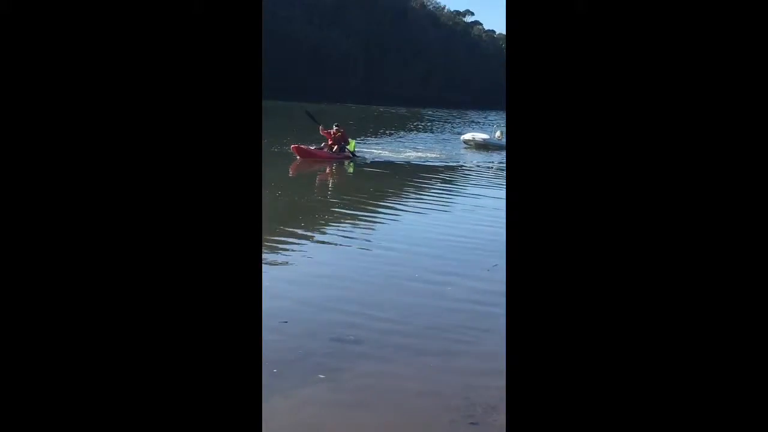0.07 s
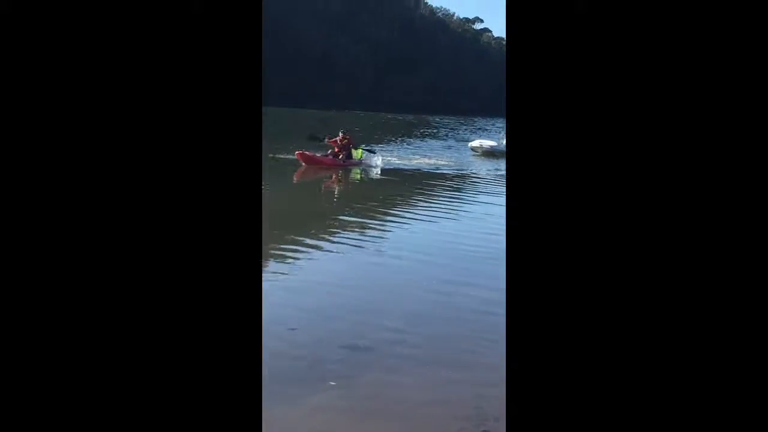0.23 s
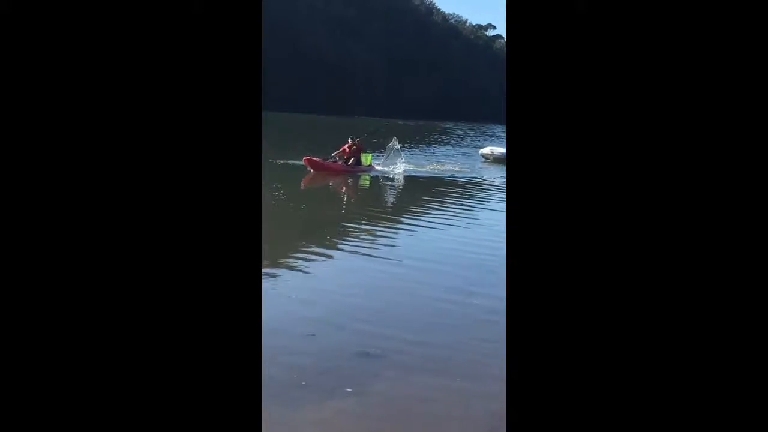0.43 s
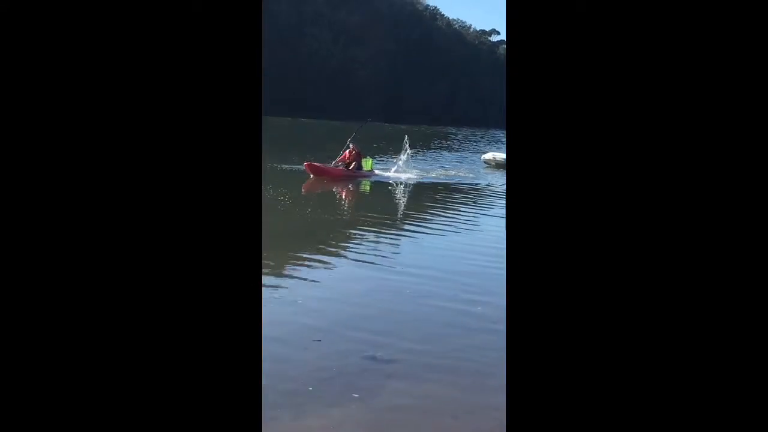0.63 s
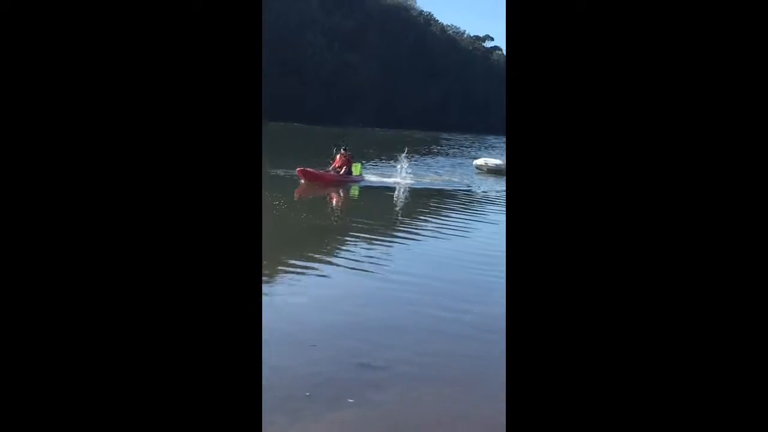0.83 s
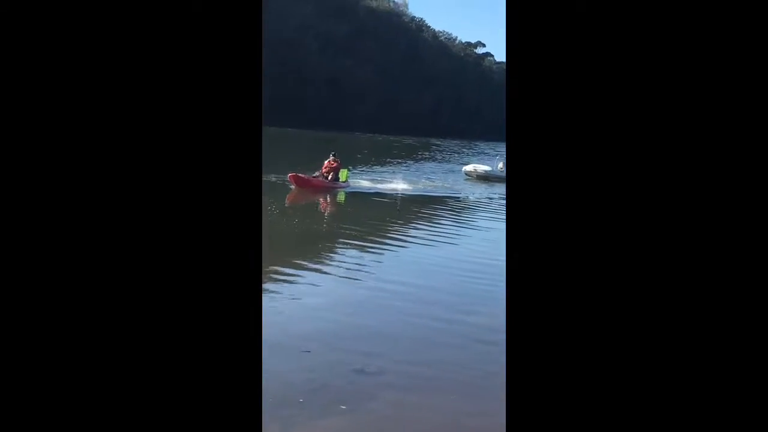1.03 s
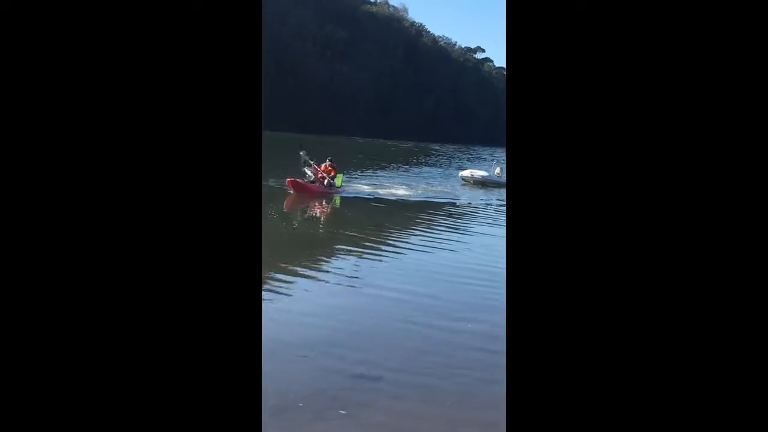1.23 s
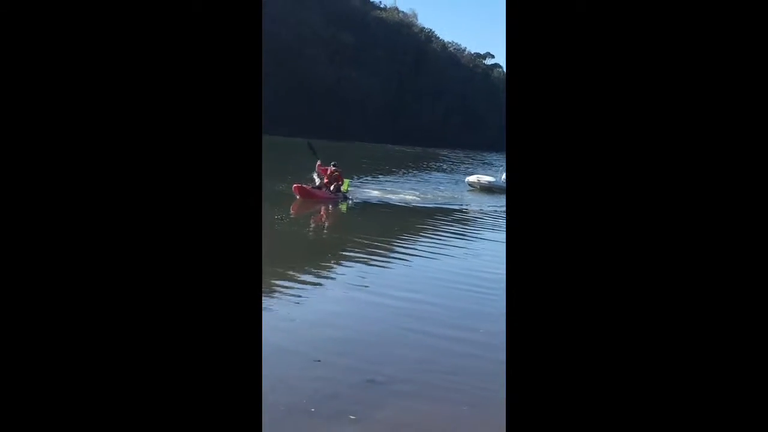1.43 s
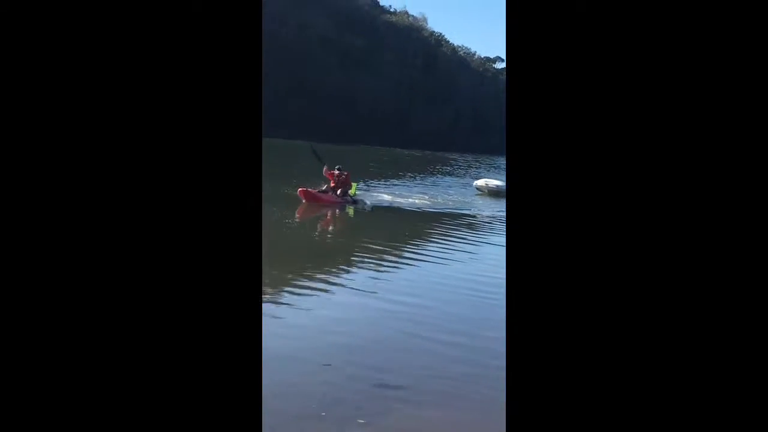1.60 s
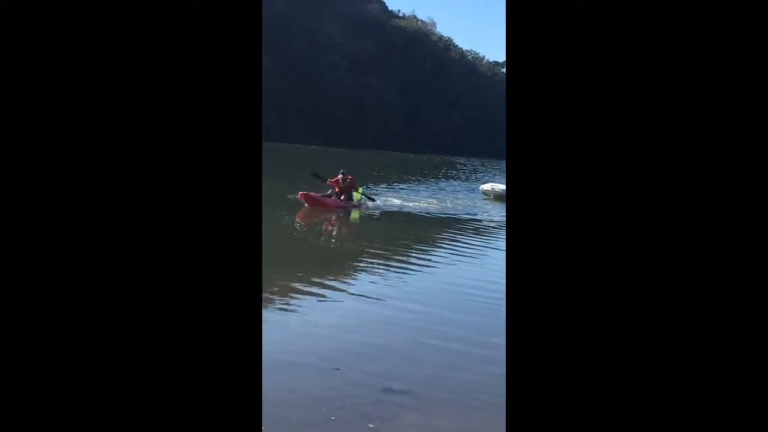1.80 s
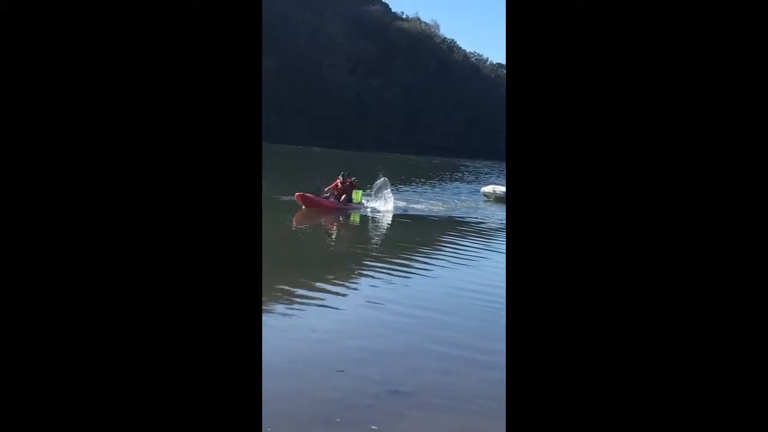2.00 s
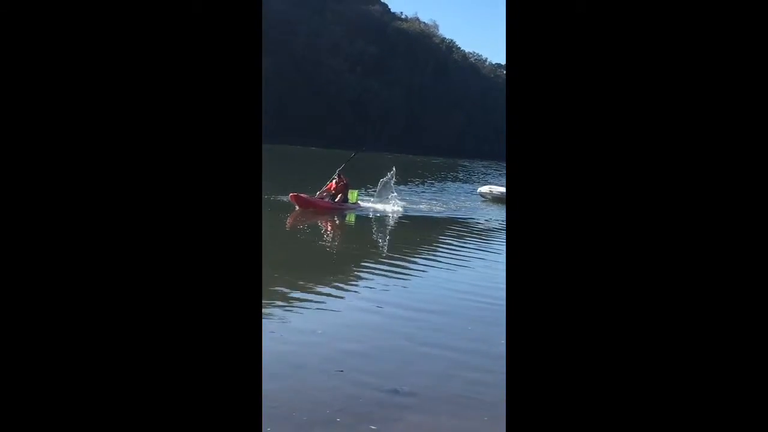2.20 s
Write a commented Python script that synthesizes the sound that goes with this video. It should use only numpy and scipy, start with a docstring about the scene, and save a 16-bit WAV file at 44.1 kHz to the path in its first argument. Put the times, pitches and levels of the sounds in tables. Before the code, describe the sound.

Wind buffets the microphone over faint splashes from a kayak paddle.

```python
"""A kayak paddled across a calm river, heard from the bank with wind on the microphone.
At the start a small bird gives one falling whistle as the first gust arrives, rumbling close up,
its eddies thumping against the microphone. In the lull, about a second in, the paddle is clearer:
some way off it throws up spray that patters back with a few plops and slaps.
A second gust covers the water and dies away at the end."""
import sys
import numpy as np
from scipy import signal
from scipy.io import wavfile
from scipy.ndimage import uniform_filter1d

SR = 44100
rng = np.random.default_rng(int(sys.argv[2]) if len(sys.argv) > 2 else 0)


def transcribe(signal):
    """Save signal, clipped to [-1, 1], as a 16-bit WAV file at the path in sys.argv[1]."""
    frames = np.atleast_2d(signal).T
    limited = np.clip(frames, -1, 1)
    pcm = np.round(limited * 32767).astype(np.int16)
    wavfile.write(sys.argv[1], SR, pcm)


N = 103635
T = np.arange(N) / SR

# still air over the river: (frequency [Hz], relative density [dB])
AIR_SPECTRUM = [(30, 2), (70, 2), (160, 5), (300, -4), (480, -15), (700, -16), (1500, -13.5), (4000, -42),
                (15000, -52)]
# the bird's whistle: (time [s], pitch [Hz], level [dB])
WHISTLE = [(0, 5350, -63), (.03, 5390, -67), (.055, 5350, -63.5), (.068, 5020, -71), (.08, 4730, -58),
           (.095, 4315, -51.5), (.115, 4280, -55), (.132, 4350, -59.5), (.145, 4300, -75)]
# falling water, heard from the bank: (time [s], splash level [dB], spray level [dB])
WATER_LEVELS = [(0.02, -59.5, -75), (.065, -60, -72), (.095, -53.5, -69), (.16, -55, -67.5),
                (.34, -56, -67.5), (.44, -61.5, -70), (.54, -56, -72), (.62, -55.5, -69.5), (.68, -56, -68),
                (.8, -52, -67), (.88, -54, -66), (.94, -52, -63.5), (1.04, -55, -63), (1.12, -53, -69.5),
                (1.25, -53.5, -65.5), (1.3, -58, -68.5), (1.39, -58.5, -74), (1.48, -56.5, -73.5),
                (1.58, -64, -73), (1.71, -58.5, -70), (1.78, -54.5, -64), (1.85, -54.5, -66.5),
                (1.97, -52.5, -63.5), (2.06, -55, -64.5), (2.16, -53, -65.5), (2.27, -51, -59),
                (2.35, -51.5, -60.5)]
# body of the splash: (frequency [Hz], relative density [dB])
SPLASH_SPECTRUM = [(250, 7.5), (400, -4.5), (600, 1), (850, 4.5), (1080, -3.5), (1350, 6), (1800, 0),
                   (2300, -2.5), (2700, -6.5), (3500, -7), (5000, -19.5), (7000, -23.5)]
# fine spray: (frequency [Hz], relative density [dB])
SPRAY_SPECTRUM = [(3500, -3), (5000, -2.5), (6500, -1.5), (9000, -6.5), (10300, -8), (11500, -15.5),
                  (13500, -7.5), (15500, -29)]
# single large bubbles: (time [s], level [dB], pitch [Hz], time to fall 60 dB [s])
PLOP_EVENTS = [(0.123, -34, 1350, 0.017), (0.177, -35, 1265, 0.021), (.186, -36, 805, 0.02),
               (1.055, -26.5, 1360, 0.011), (1.316, -37.5, 680, 0.034), (1.496, -30, 1370, 0.011),
               (1.862, -33, 1320, 0.017), (1.904, -43.5, 1700, 0.043), (2.309, -32.5, 1380, 0.018)]
# slaps out on the water: (time [s], level [dB], decay [s])
SLAP_EVENTS = [(0.077, -56.5, 0.017), (0.088, -49.5, 0.012), (0.386, -50, 0.0022), (0.573, -59, 0.0097),
               (.757, -73, 0.0059), (1.110, -46.5, .005), (1.192, -50.5, 0.018), (1.238, -51.5, 0.01),
               (1.255, -53, 0.0036), (1.533, -51.5, 0.007), (1.766, -56.5, 0.032), (1.961, -52, 0.027)]
# struck water: (frequency [Hz], relative density [dB])
SLAP_SPECTRUM = [(600, 7), (1400, -3.5), (3000, 1.5), (6000, -16), (9000, -16), (15000, -45)]
# wind at the microphone: (time [s], level [dB])
WIND_LEVELS = [(0, -35.5), (.06, -37.5), (.12, -30.5), (.18, -36.5), (.23, -26.5), (.35, -24), (.41, -22),
               (.48, -26), (.55, -24.5), (.59, -29), (.65, -33), (.69, -31), (.8, -40), (.9, -40.5),
               (1.02, -40), (1.1, -52), (1.17, -39), (1.22, -34), (1.33, -36.5), (1.4, -28), (1.47, -29),
               (1.54, -28), (1.585, -42), (1.63, -25.5), (1.72, -27), (1.77, -25), (1.85, -21.5),
               (1.92, -25), (2.0, -23.5), (2.08, -27.5), (2.115, -33.5), (2.19, -27.5), (2.235, -41),
               (2.275, -32.5), (2.35, -44.5)]
# rumble in a strong gust: (frequency [Hz], relative density [dB])
RUMBLE_SPECTRUM = [(26, -33), (42, -1), (65, 5.5), (95, 1.5), (150, -4), (240, -5.5), (340, -11.5),
                   (480, -24.5), (700, -34), (1100, -57)]
# eddies on the microphone: (time [s], swing level [dB], centre [Hz], edge level [dB])
EDDY_HITS = [(.199, -16.5, 75, -49), (.230, -19.5, 162, -48), (0.265, -18, 217, -48),
             (0.299, -23, 182, -50), (.334, -41, 129, -31), (.389, -8, 97, -19.5), (0.41, -13.5, 160, -28),
             (0.434, -22.5, 193, -40), (.461, -16, 121, -31.5), (.502, -16, 200, -25.5),
             (.547, -13, 79, -27), (.618, -14, 201, -35), (.683, -22.5, 79, -33), (0.747, -20.5, 68, -45),
             (0.779, -25, 174, -50), (.848, -23, 76.5, -64), (1.017, -30.5, 62, -72),
             (1.217, -22, 124, -38), (1.294, -28.5, 97, -52), (1.374, -26.5, 181, -54),
             (1.462, -18, 119, -50), (1.495, -24, 170, -60), (1.636, -16, 106, -39), (1.667, -18, 205, -30),
             (1.715, -20, 139, -28), (1.75, -13.5, 148, -27.5), (1.763, -17.5, 188, -32),
             (1.808, -11.5, 147, -16.5), (1.825, -14, 220, -25), (1.840, -17, 204, -44),
             (1.996, -18, 133, -19), (2.035, -21, 222, -28), (2.085, -15, 133, -35),
             (2.179, -15.5, 102, -40), (2.216, -34, 194, -39), (2.273, -21.5, 65, -64)]

AIR_DB, BANK_T60_S, CUTOFF_HZ = -56.5, .8, 15700
BIRD_FLUTTER_DB, BIRD_OCTAVE_DB, BIRD_ECHO_DB, BIRD_WAVER = 3, -21, -14, .0076
SPLASH_DB, SPRAY_DB, SPLASH_FLICKER_DB, SPRAY_FLICKER_DB = 1, 1.5, 1.57, 1.5
DROPS_PER_S, DROP_SPREAD_DB, DROP_SHARE = 650, 9.5, .28
BUBBLES_PER_S, BUBBLE_RING_CYCLES, BUBBLE_DB = 190, 66, -9
PLOP_ATTACK_S, PLOP_RISE = .0015, .08   # rise: fraction of the pitch per ring time
FLUTTER_DB, FLUTTER_HZ = 5.5, 15
GUST_DB, BRIGHTENS_ABOVE_HZ, BRIGHTENING = -21.5, 75, .5   # dB per octave for each dB of wind
EDDY_HALF_WIDTH_CYCLES, EDDY_LOW_CUT_HZ = .39, 47.4
EDGE_WIDTH_S, EDGE_LEAD_S = .00085, .0011
EDGE_REF_DB, EDGE_HALVING_DB = -24.5, 37.5   # a stronger edge is also shorter


def from_db(db):
    """Decibels to gain."""
    return 10 ** (np.asarray(db) / 20)


def rms_one(x):
    """Scale to rms 1."""
    return x / np.sqrt(np.mean(x ** 2) + 1e-20)


def in_time(rows):
    """Each column of a curve at every sample."""
    times, *columns = np.transpose(rows)
    return [np.interp(T, times, column) for column in columns]


def filtered(x, hz, kind, order=2):
    """Butterworth filter."""
    return signal.sosfilt(signal.butter(order, hz, kind, fs=SR, output="sos"), x)


def drift(hz):
    """Random motion of rms 1, mostly slower than hz."""
    hop, settle = 40, 2000
    pole = np.exp(-2 * np.pi * hz * hop / SR)
    noise = rng.standard_normal(N // hop + settle + 2)
    slow = signal.lfilter([1], [1, -2 * pole, pole * pole], noise)[settle:]
    return np.interp(np.arange(N) / hop, np.arange(len(slow)), rms_one(slow))


def bands(spectrum, count):
    """Split a spectrum into bands of total power 1: (low [Hz], high [Hz], gain)."""
    hz, db = np.transpose(spectrum)
    edges = np.geomspace(hz[0], hz[-1], count + 1)
    log_centres = np.log(edges[:-1] * edges[1:]) / 2
    gain = from_db(np.interp(log_centres, np.log(hz), db)) * np.sqrt(np.diff(edges))
    return zip(edges, edges[1:], gain / np.linalg.norm(gain))


def impacts(per_s):
    """Random clicks, many small and a few large."""
    sizes = from_db(DROP_SPREAD_DB * np.minimum(rng.exponential(1, N), np.pi))
    signs = rng.choice([-1, 1], N)
    return sizes * signs * (rng.random(N) < per_s / SR) + 1e-18


def wash(spectrum, flicker_db, drop_share, count):
    """Noise mixed with drop impacts; the bands flicker singly and together."""
    out, together = 0, drift(60)
    drops = rms_one(impacts(DROPS_PER_S))
    for low, high, gain in bands(spectrum, count):
        source = np.sqrt(drop_share) * drops + np.sqrt(1 - drop_share) * rng.standard_normal(N)
        band = rms_one(filtered(source, [low, high], "band"))
        out += gain * band * from_db(flicker_db * (drift(17) + together))
    return rms_one(out)


def air():
    """Still outdoor air: a faint, steady bed of noise."""
    return from_db(AIR_DB) * wash(AIR_SPECTRUM, flicker_db=0, drop_share=0, count=12)


def bird():
    """One falling whistle, with a faint tail from the wooded banks."""
    hz, db = in_time(WHISTLE)
    phase = 2 * np.pi * np.cumsum(hz * (1 + BIRD_WAVER * drift(120))) / SR
    tone = np.sqrt(2) * (np.sin(phase) + from_db(BIRD_OCTAVE_DB) * np.sin(2 * phase))
    call = tone * from_db(db + BIRD_FLUTTER_DB * drift(150)) * (T < WHISTLE[-1][0])
    banks = rng.standard_normal(N) * from_db(-60 * T / BANK_T60_S)
    echo = signal.fftconvolve(call, banks / np.linalg.norm(banks))[:N]
    return call + from_db(BIRD_ECHO_DB) * echo


def bubbles():
    """Small bubbles ring at random moments, the higher ones more briefly."""
    out, pitches = 0, np.geomspace(700, 3200, 20)
    for hz in pitches:
        pole = from_db(-60 * hz / (BUBBLE_RING_CYCLES * SR))
        angle = 2 * np.pi * hz / SR
        kicks = impacts(BUBBLES_PER_S / len(pitches))
        out += signal.lfilter([0, np.sin(angle)], [1, -2 * pole * np.cos(angle), pole * pole], kicks)
    return rms_one(out)


def splashing():
    """Out on the river, water thrown by the paddle falls back as drops, bubbles and fine spray."""
    splash_db, spray_db = in_time(WATER_LEVELS)
    body = from_db(BUBBLE_DB) * bubbles()
    body += from_db(SPLASH_DB) * wash(SPLASH_SPECTRUM, SPLASH_FLICKER_DB, DROP_SHARE, count=16)
    spray = wash(SPRAY_SPECTRUM, SPRAY_FLICKER_DB, DROP_SHARE, count=10)
    return from_db(splash_db) * body + from_db(spray_db + SPRAY_DB) * spray


def slaps():
    """Short bright bursts where water is struck."""
    envelope = np.zeros(N)
    for start, db, decay in SLAP_EVENTS:
        envelope += from_db(db) * (T > start) * np.exp(-np.abs(T - start) / decay)
    return envelope * wash(SLAP_SPECTRUM, SPLASH_FLICKER_DB, DROP_SHARE, count=8)


def plops():
    """Larger bubbles ring and rise a little in pitch, carrying clearly to the bank."""
    out = np.zeros(N)
    for start, db, hz, t60 in PLOP_EVENTS:
        age = np.maximum(T - start, 0)
        attack = 1 - np.exp(-age / PLOP_ATTACK_S)
        ring = from_db(db - 60 * np.minimum(age / t60, 10))
        phase = 2 * np.pi * hz * age * (1 + PLOP_RISE * age / t60 / 2)
        out += attack * ring * np.sin(phase)
    return out


def wind_rumble():
    """Turbulence at the microphone: stronger wind is louder and brighter, and its top flutters."""
    wind_db, = in_time(WIND_LEVELS)
    out, flutter = 0, drift(FLUTTER_HZ)
    for low, high, gain in bands(RUMBLE_SPECTRUM, count=11):
        octaves = max(np.log2(np.sqrt(low * high) / BRIGHTENS_ABOVE_HZ), 0)
        band = filtered(rng.standard_normal(N + SR), [low, high], "band", order=3)[SR:]
        band /= np.sqrt(uniform_filter1d(band ** 2, size=4000) + 1e-12)   # even out chance swells
        band = rms_one(band * from_db(FLUTTER_DB * min(octaves, 2) / 2 * flutter))
        tilt_db = BRIGHTENING * octaves * (wind_db - GUST_DB)
        out += gain * band * from_db(wind_db + tilt_db)
    return out


def wind_eddies():
    """Each eddy hits the microphone as a round swing of pressure, led by a quick, sharp edge."""
    out = np.zeros(N)
    for time, swing_db, hz, edge_db in EDDY_HITS:
        cycles = hz * (T - time)
        swing = np.sin(2 * np.pi * cycles) * np.exp(-(cycles / EDDY_HALF_WIDTH_CYCLES) ** 2 / 2)
        width_s = EDGE_WIDTH_S / 2 ** ((edge_db - EDGE_REF_DB) / EDGE_HALVING_DB)
        widths = (T - time + EDGE_LEAD_S) / width_s
        edge = -3 * widths / (1 + widths ** 2) ** 2
        out += from_db(swing_db) * swing + from_db(edge_db) * edge
    return filtered(out, EDDY_LOW_CUT_HZ, "high")


def scene():
    """One microphone on the bank: wind right on it, paddle and bird farther off."""
    wind = wind_rumble() + wind_eddies()
    paddle = splashing() + plops() + slaps()
    return (wind + paddle + bird() + air())[None]


def record(dry):
    """The recorder cuts the top steeply."""
    return signal.sosfilt(signal.ellip(10, .1, 80, CUTOFF_HZ, fs=SR, output="sos"), dry)


dry = scene()
out = record(dry)
transcribe(out)
```